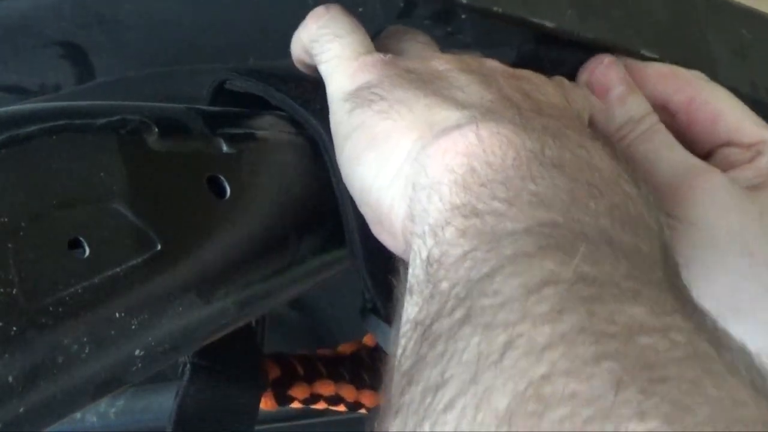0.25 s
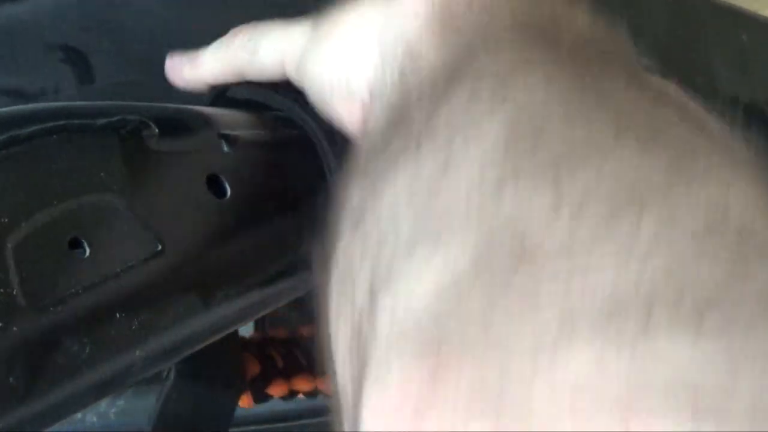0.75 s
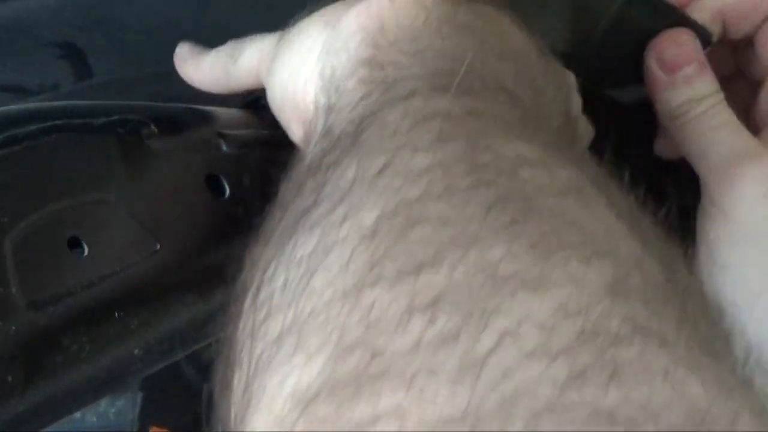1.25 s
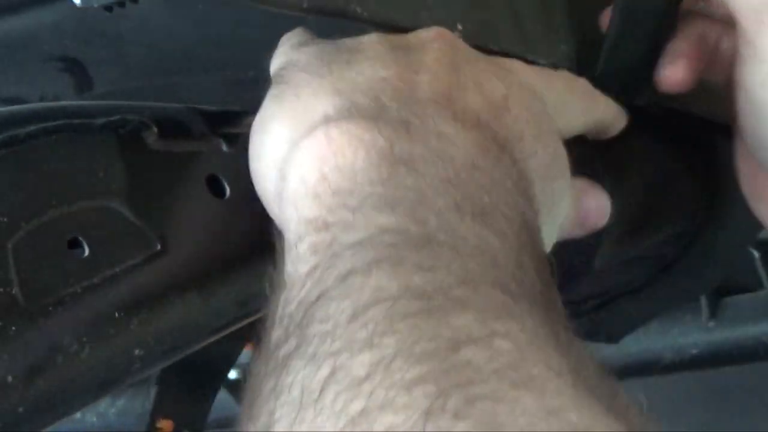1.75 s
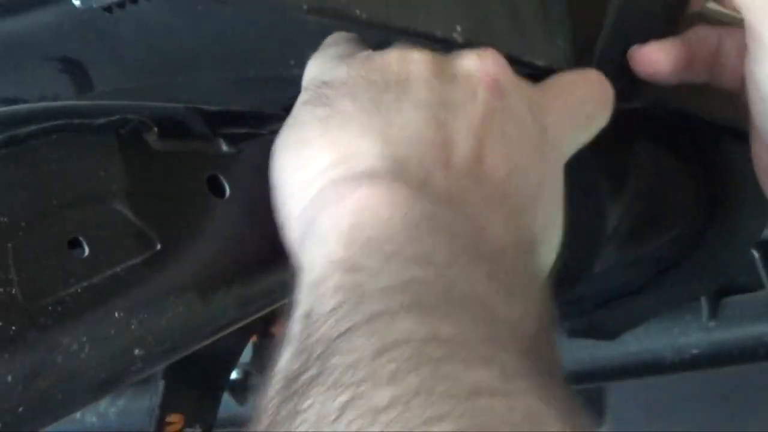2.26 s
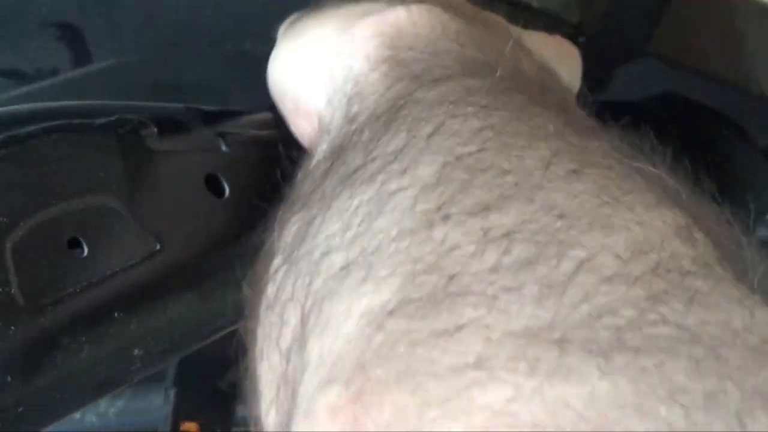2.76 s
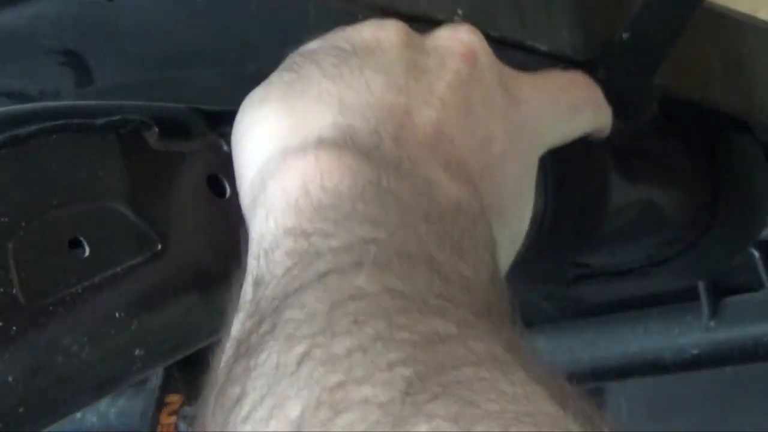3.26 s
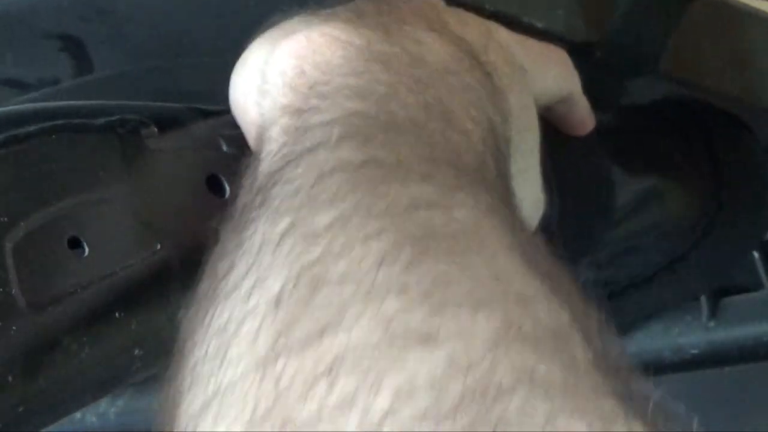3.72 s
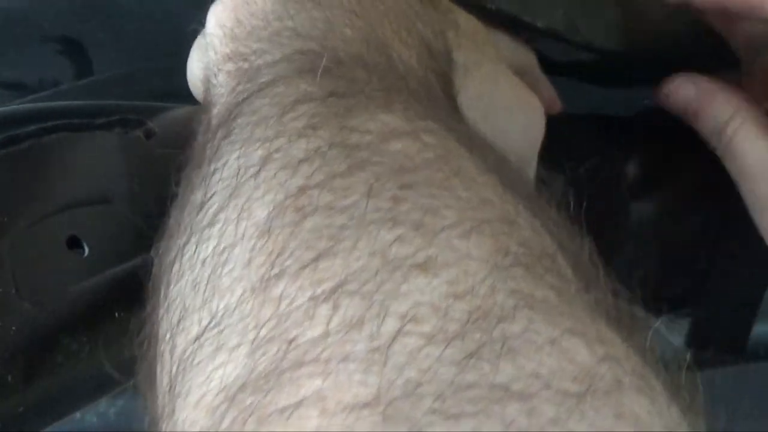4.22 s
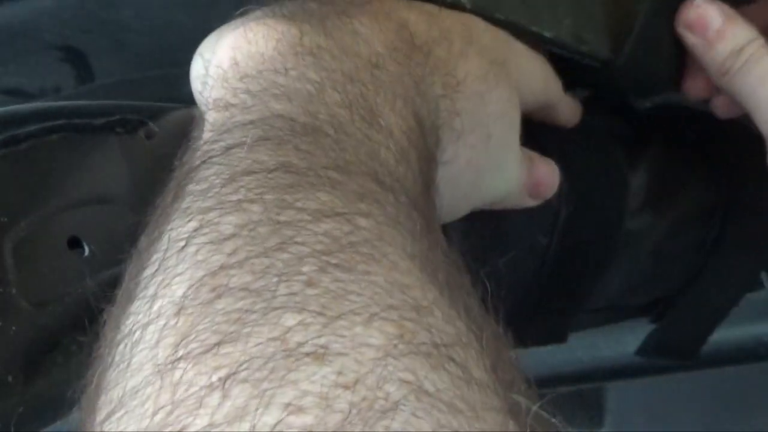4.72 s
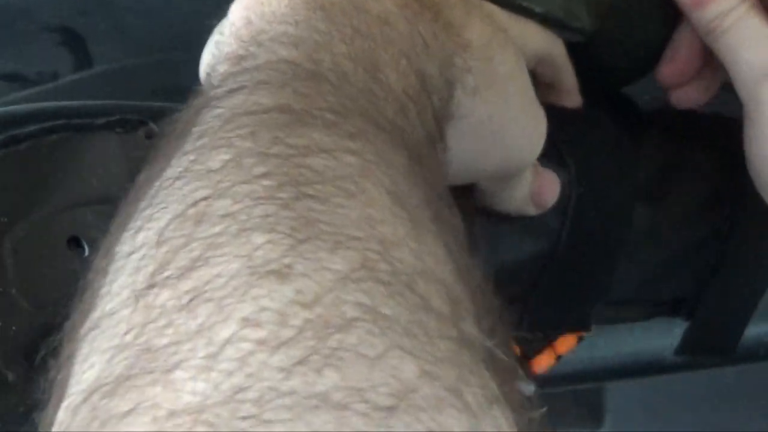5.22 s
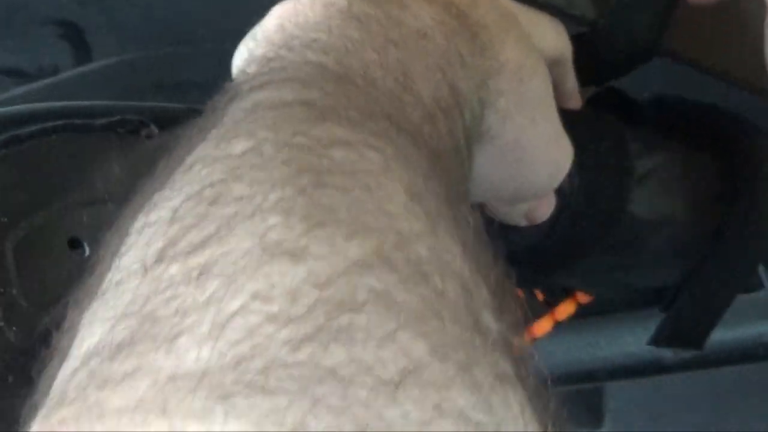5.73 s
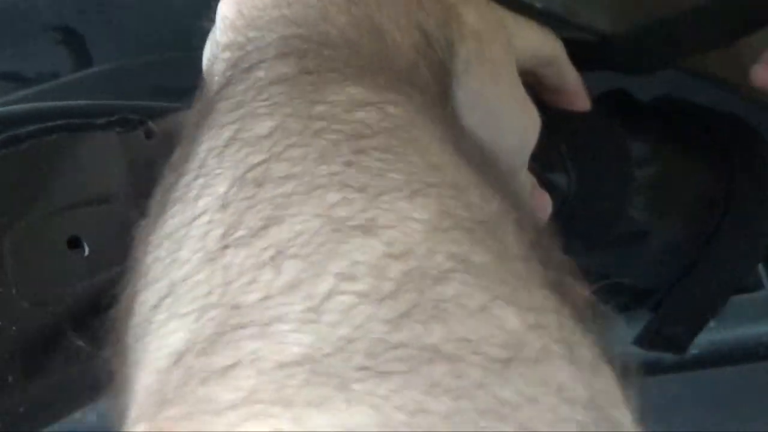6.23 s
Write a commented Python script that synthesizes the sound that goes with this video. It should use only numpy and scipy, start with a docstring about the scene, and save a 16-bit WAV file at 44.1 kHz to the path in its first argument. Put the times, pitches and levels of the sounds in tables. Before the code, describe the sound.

Hook-and-loop straps ripped open and pressed shut in short crackly bursts, with soft fabric rustling and light knocks, close up in a garage.

```python
"""Hook-and-loop straps in a garage

Straps on a fabric bag are ripped open and pressed shut close to a stereo microphone.
Hooks snap free one by one over a dense crackle of small hooks and stiff backing. Hands rustle the
cloth, push the bag and knock the panel under it; a finger squeaks. Behind: air, hiss, deep rumble."""
import sys
import numpy as np
from scipy import signal
from scipy.fft import rfft, irfft, next_fast_len
from scipy.io import wavfile
from scipy.ndimage import uniform_filter1d

SR = 44100
rng = np.random.default_rng(int(sys.argv[2]) if len(sys.argv) > 2 else 0)


def transcribe(u):
    """Save the signal u as a 16-bit wav file named by the first command-line argument.

    u: samples, shape (n,) or (channels, n), limited to [-1, 1]; the rate is SR.
    q: integer samples, one column per channel.
    """
    v = np.clip(np.atleast_2d(u).T, -1, 1)
    q = np.round(v * 32767).astype(np.int16)
    wavfile.write(sys.argv[1], SR, q)


N = 285768

# still air and microphone hiss (frequency [Hz], density [dB])
AIR_SPECTRUM = [(15, -30), (30, -17), (60, -3), (200, 2.5), (400, 4.5), (1000, 4.5), (2000, 0.5),
                (8000, -8.5), (13000, -11), (14500, -42)]
# deep rumble (time [s], level [dB])
RUMBLE_LEVELS = [(0.0, -73), (0.11, -72.5), (0.65, -90), (0.96, -61.5), (1.17, -83), (1.26, -65),
                 (1.53, -84), (1.7, -60), (2.02, -83), (2.98, -70), (3.32, -80), (3.93, -72), (4.42, -85.5),
                 (5.68, -79), (5.72, -73), (6.48, -60)]
# deep rumble (frequency [Hz], density [dB])
RUMBLE_SPECTRUM = [(15, -25), (30, -3), (50, -5.5), (100, 3.5), (140, -2), (250, -53)]
# reflections (frequency [Hz], T60 [s], level [dB], side over mid [ratio])
GARAGE_BANDS = [(151, 0.88, -5.5, 0.023), (400, 0.76, -9.5, 0.16), (885, 0.49, -5, 0.34),
                (3000, 0.32, -9, 0.52), (6150, 0.37, -9.5, 0.58), (10900, 0.076, -5, 0.2)]
# finger on the panel (time [s], slip rate [Hz], level [dB])
SQUEAK_PATH = [(3.86, 500, -60), (3.87, 650, -47), (3.876, 1040, -44), (3.889, 1075, -39), (3.9, 1040, -53),
               (3.99, 1040, -66)]
# panel modes (frequency [Hz], gain [dB], T60 [s])
PANEL_MODES = [(178.8, -7.5, 0.28), (252, -6, 0.22), (347, -7, 0.16), (555, -7, 0.052), (700, -2.5, 0.076),
               (825, -6, 0.099), (1138, 5.5, 0.035), (2150, 9, .006)]
# knocks on the panel (time [s], strength [dB], pitch favoured by the spot [Hz])
PANEL_KNOCKS = [(0.049, -52.5, 200), (0.806, -44, 265), (.86, -41.5, 197), (1.241, -42, 200),
                (1.525, -33.5, 1130), (1.605, -35.5, 350), (1.637, -44, 186), (2.738, -44.5, 313),
                (3.0945, -33, 2000), (3.101, -37.5, 630), (3.826, -40, 255), (3.884, -41, 250),
                (5.64, -39, 368), (6.075, -44, 332), (6.125, -42, 163), (6.236, -45, 400),
                (6.362, -34.5, 330), (6.376, -40.5, 180)]
# pushed bag (frequency [Hz], density [dB])
BAG_SPECTRUM = [(15, -52), (40, -13), (80, -15), (170, 2.5), (260, 2.5), (350, 5), (600, 2), (1200, -14)]
# ongoing cloth rustle, rising and falling (time [s], crackle [dB], bag [dB])
RUSTLE_LEVELS = [(0, -87, -72), (.3, -67.5, -78), (.5, -67, -69.5), (.68, -73, -89), (1.1, -78, -68),
                 (1.9, -75, -79), (2.2, -69.5, -70), (3.0, -57.5, -55.5), (3.25, -62, -89),
                 (3.43, -60.5, -62), (3.65, -67.5, -68), (3.98, -62, -106), (4.18, -73.5, -67),
                 (4.45, -65, -66), (4.66, -71, -88.5), (4.92, -59.5, -65), (5.5, -61.5, -71),
                 (6.1, -67, -61), (6.22, -65.5, -75.5), (6.48, -102, -74)]
# hand moves (full strength at [s], swell [s], hold [s], crackle [dB], backing [dB], bag [dB])
HAND_TUGS = [(0.042, 0.061, 0.039, -55, -63.5, -66.5), (0.152, 0.016, 0.012, -60, -80, -67),
             (0.813, 0.1, 0.051, -50, -49.5, -56.5), (0.931, 0.027, 0.027, -58.5, -63, -59),
             (1.231, 0.003, 0.036, -34, -49, -49), (1.29, .03, 0.11, -53.5, -70, -77),
             (1.441, 0.0062, 0.013, -53, -54, -62), (1.49, 0.0053, 0.0079, -53, -42, -55),
             (1.527, 0.0077, 0.043, -41.5, -43, -56.5), (1.594, 0.004, 0.024, -35, -43, -44.5),
             (1.686, 0.045, .12, -57.5, -57.5, -63), (2.021, 0.13, 0.088, -59.5, -72, -70),
             (2.281, 0.067, 0.012, -49, -53, -60), (2.306, 0.0028, 0.0076, -40, -41.5, -63),
             (2.337, 0.0054, 0.0043, -44, -51, -62), (2.358, 0.0044, 0.0037, -37.5, -56, -68),
             (2.399, 0.002, 0.012, -42, -47, -66), (2.46, 0.0058, 0.032, -42, -41, -59),
             (2.558, 0.0049, 0.0054, -34, -42, -77), (2.593, 0.0053, 0.0082, -44, -40.5, -75),
             (2.627, 0.003, 0.025, -40, -46, -64), (2.666, 0.041, 0.027, -31, -68, -81),
             (2.729, 0.073, 0.072, -29.5, -63, -51.5), (2.872, 0.091, 0.038, -29, -42, -47),
             (3.095, 0.0076, 0.021, -81, -54, -48.5), (3.787, 0.13, 0.048, -53.5, -76, -55),
             (3.86, 0.017, 0.024, -49, -46.5, -48), (4.077, 0.017, 0.027, -61.5, -59.5, -65),
             (4.258, 0.0089, 0.0049, -48, -60, -61), (4.584, 0.015, 0.01, -57.5, -91, -72),
             (4.789, 0.31, 0.026, -53.5, -57.5, -65.5), (5.019, 0.0061, 0.022, -47.5, -54.5, -62),
             (5.266, 0.13, 0.12, -42.5, -72, -55.5), (5.591, 0.0029, 0.0059, -39.5, -71, -56.5),
             (5.64, 0.045, 0.06, -35, -71, -51), (5.715, 0.085, 0.049, -31, -70, -49.5),
             (5.85, 0.077, 0.04, -28.5, -42, -47), (5.972, 0.018, 0.011, -30.5, -50, -50.5),
             (6.067, .01, 0.081, -56.5, -72, -63), (6.23, .01, 0.078, -84, -61.5, -59),
             (6.351, 0.024, 0.016, -68, -55, -51)]
# stiff backing (frequency [Hz], gain [dB])
BACKING_SPECTRUM = [(600, 3.5), (900, 0), (1300, 6.5), (1900, 6), (2600, 11)]
# base colour of all hooks (frequency [Hz], gain [dB])
HOOK_SPECTRUM = [(700, 20), (2000, 6), (3000, 6.5), (4500, 4.5), (6500, 6), (9000, 7.5), (11500, 7),
                 (14000, 5.5)]
# how the strap is held (time [s], low cut [Hz], gain of the fold's hollow [dB])
STRAP_GRIP = [(0.0, 2600, -6), (1.2, 4300, 12.5), (1.3, 4300, -10), (1.45, 2950, 2), (2.2, 2350, -1),
              (2.3, 1190, 2.5), (2.72, 1300, -0.5), (2.85, 1950, -3.5), (4.9, 2800, 1.5), (5.15, 3000, 3.5),
              (5.4, 3000, 7), (5.6, 3420, 12), (5.76, 3430, 7.5), (5.82, 2280, -2), (5.96, 2800, 1.5)]
# loudest hooks (time [s], peak [dB], ring [Hz])
HOOK_SNAPS = [(.0502, -37, 3400), (.3769, -40, 9700), (.4618, -42, 10000), (.8134, -26, 5900),
              (.8264, -26, 6500), (.8446, -21, 5800), (.869, -15, 5100), (.8779, -24, 5300),
              (.9563, -36, 10900), (1.2005, -39, 5600), (1.2315, -19, 7500), (1.2354, -13, 6700),
              (1.239, -17, 5900), (1.2451, -17, 6900), (1.2493, -14, 5900), (1.2541, -10, 6100),
              (1.2579, -10, 8600), (1.263, -9, 6100), (1.4705, -26, 6100), (1.485, -18, 7200),
              (1.4928, -14, 5600), (1.5192, -12, 5700), (1.532, -18, 5000), (1.5472, -21, 5300),
              (1.5592, -21, 6000), (1.5749, -23, 8000), (1.5922, -18, 5700), (1.6841, -26, 8300),
              (1.711, -28, 9400), (1.7314, -29, 8000), (1.7573, -24, 6400), (1.7991, -25, 8100),
              (2.0949, -34, 9500), (2.271, -28, 5700), (2.2763, -20, 7500), (2.2842, -21, 7800),
              (2.3092, -13, 8200), (2.3155, -18, 6500), (2.3373, -14, 5000), (2.3429, -20, 8000),
              (2.3611, -17, 5600), (2.3987, -14, 5200), (2.4267, -19, 5400), (2.4357, -23, 4300),
              (2.455, -20, 5600), (2.4624, -19, 5600), (2.4693, -15, 6500), (2.4808, -18, 4400),
              (2.4855, -17, 4100), (2.5098, -22, 6200), (2.5255, -18, 4100), (2.5588, -17, 5900),
              (2.5874, -23, 4100), (2.6165, -27, 5500), (2.6285, -18, 5400), (2.6335, -19, 6000),
              (2.6405, -19, 6000), (2.6628, -16, 5000), (2.6692, -16, 3400), (2.6833, -15, 4800),
              (2.6971, -18, 4800), (2.76, -15, 7500), (2.8372, -19, 6400), (2.8761, -13, 6900),
              (2.8929, -12, 7700), (2.9247, -11, 8900), (2.982, -28, 3900), (3.0948, -31, 2600),
              (3.1538, -30, 8300), (3.2666, -25, 10200), (3.7708, -31, 3840), (3.7849, -22, 6000),
              (4.0702, -41, 6700), (4.2575, -28, 6500), (4.3984, -41, 8800), (4.4506, -41, 10900),
              (4.7488, -32, 8600), (4.7818, -20, 7900), (4.7887, -18, 8800), (4.7949, -18, 7800),
              (4.8256, -22, 8400), (5.0183, -11, 6800), (5.0335, -16, 7100), (5.0915, -10, 5800),
              (5.0957, -10, 6700), (5.1724, -17, 5800), (5.1753, -12, 6000), (5.1793, -10, 6000),
              (5.2044, -22, 7000), (5.232, -17, 6200), (5.238, -11, 6600), (5.2461, -20, 5500),
              (5.2599, -14, 6900), (5.2659, -5, 6700), (5.292, -20, 5200), (5.3103, -13, 7200),
              (5.3149, -13, 4900), (5.3227, -12, 6500), (5.3406, -11, 6700), (5.3515, -14, 4300),
              (5.3631, -16, 5800), (5.3756, -19, 4900), (5.3798, -13, 6600), (5.476, -24, 4600),
              (5.481, -23, 5000), (5.5872, -18, 5900), (5.5949, -10, 3900), (5.5993, -17, 4200),
              (5.6112, -17, 4000), (5.6196, -17, 3900), (5.6351, -12, 3900), (5.6408, -11, 4800),
              (5.6468, -7, 4600), (5.6662, -13, 4700), (5.6975, -12, 5800), (5.7138, -15, 4300),
              (5.7264, -9, 4400), (5.7359, -11, 4600), (5.8053, -18, 7900), (5.8108, -16, 5700),
              (5.8322, -16, 8400), (5.8514, -9, 8500), (5.8711, -11, 8900), (5.8854, -12, 5800),
              (5.9168, -19, 6900), (5.9308, -19, 9000), (5.9496, -14, 7300), (5.9715, -16, 7500),
              (5.9857, -13, 6700)]
# microphone balance (frequency [Hz], left over right [dB])
MIC_BALANCE = [(300, -0.6), (1200, 0), (2500, -0.5), (5000, -2.5), (12000, 0)]


def amp(db):
    """dB to gain."""
    return 10 ** (np.asarray(db) / 20)


def unit_rms(x):
    """Scale to rms 1."""
    return x / np.sqrt(np.mean(x ** 2) + 1e-20)


def in_time(rows):
    """Each column after time, interpolated per sample."""
    times_s, *columns = np.transpose(rows)
    return [np.interp(np.arange(N) / SR, times_s, c) for c in columns]


def at_hz(rows, hz, column=1):
    """Interpolate a column over log frequency."""
    table = np.array(rows)
    return np.interp(np.log(np.maximum(hz, 1)), np.log(table[:, 0]), table[:, column])


def colour(x, spectrum):
    """Zero-phase filter from a spectrum table."""
    size = next_fast_len(x.shape[-1])
    gain = amp(at_hz(spectrum, np.fft.rfftfreq(size, 1 / SR)))
    return irfft(rfft(x, size) * gain, size)[..., :x.shape[-1]]


def butter(x, order, hz, kind):
    """Butterworth filter."""
    return signal.sosfilt(signal.butter(order, hz, kind, fs=SR, output="sos"), x)


def minimum_phase(level_db):
    """Causal response of given magnitude, by the folded cepstrum."""
    cepstrum = irfft(np.log(amp(level_db)))
    half = cepstrum.shape[-1] // 2
    fold = np.r_[1, np.full(half - 1, 2), 1, np.zeros(half - 1)]
    return np.exp(rfft(cepstrum * fold))


def drift(corner_hz):
    """Slow noise, rms 1."""
    r = np.exp(-2 * np.pi * corner_hz / SR)
    return unit_rms(signal.lfilter([1], [1, -2 * r, r * r], rng.standard_normal(N + SR))[SR:])


def ring(clicks, hz, t60_s):
    """Resonator: a unit click starts a decaying unit sine."""
    r, w = amp(-60 / (t60_s * SR)), 2 * np.pi * hz / SR
    return signal.lfilter([0, np.sin(w)], [1, -2 * r * np.cos(w), r * r], clicks + 1e-18)


def grains(colour_db, per_s, spread_db, clump_db, band_hz, t60_cycles):
    """Random clicks, uneven and clumped in level, dealt to 16 short resonances; rms 1."""
    sizes = amp(spread_db * np.minimum(rng.exponential(1, N), 4) + clump_db * drift(56.5))
    clicks = sizes * rng.choice([-1, 1], N) * (rng.random(N) < per_s / SR)
    pitches_hz, dealt = np.geomspace(*band_hz, 16), rng.integers(0, 16, N)
    clicks /= np.sqrt(sum(amp(colour_db(hz)) ** 2 / hz for hz in pitches_hz))  # colour leaves power even
    return unit_rms(sum(ring(clicks * (dealt == k) * amp(colour_db(hz)), hz, t60_cycles / hz)
                        for k, hz in enumerate(pitches_hz)))


def air(level_db=-69, width=0.66):
    """Still air and microphone hiss: steady stereo noise."""
    mid, side = colour(rng.standard_normal((2, N)), AIR_SPECTRUM)
    return amp(level_db) * unit_rms(mid + width * side * [[1], [-1]])


def rumble():
    """Deep noise that swells and sinks."""
    return amp(in_time(RUMBLE_LEVELS)[0]) * unit_rms(colour(rng.standard_normal(N), RUMBLE_SPECTRUM))


def garage(x, onset_s=0.00067):
    """Reflections: a noise tail decaying per band, partly unlike left and right."""
    t = np.arange(SR) / SR
    edges_hz, tail = np.geomspace(60, 16000, 13), 0
    for low, high in zip(edges_hz, edges_hz[1:]):
        t60_s, level_db, width = (at_hz(GARAGE_BANDS, np.sqrt(low * high), c) for c in (1, 2, 3))
        mid, side = butter(rng.standard_normal((2, SR)), 2, [low, high], "band")
        fade = amp(level_db - 60 * t / t60_s) / np.sqrt(t60_s * SR / np.log(1e6))
        tail = tail + fade * (mid + width * side * [[1], [-1]])
    return signal.fftconvolve(x[None], tail * (1 - np.exp(-t / onset_s)), axes=1)[:, :N]


def finger_squeak(rough_db=2.5, wobble=0.015):
    """Stick-slip on the panel: a tone and its octave, unsteady in level and pitch."""
    hz, level_db = in_time(SQUEAK_PATH)
    t = np.arange(N) / SR
    phase = 2 * np.pi * np.cumsum(hz * (1 + wobble * drift(65))) / SR
    sliding = (t > SQUEAK_PATH[0][0]) & (t < SQUEAK_PATH[-1][0])
    return sliding * amp(level_db + rough_db * drift(60)) * (np.sin(phase) + 0.1 * np.sin(2 * phase))


def panel_knocks(focus_db_per_oct2=18, spread_db=1.5, low_cut_hz=140):
    """Each knock rings the panel modes, most those near the pitch of its spot."""
    out = np.zeros(N)
    scatter_db = spread_db * rng.standard_normal((len(PANEL_KNOCKS), len(PANEL_MODES)))
    times_s, strength_db, spot_hz = np.transpose(PANEL_KNOCKS)
    for k, (hz, mode_db, t60_s) in enumerate(PANEL_MODES):
        spot_db = -focus_db_per_oct2 * np.log2(hz / spot_hz) ** 2
        clicks = np.zeros(N)
        clicks[(times_s * SR).astype(int)] = amp(strength_db + mode_db + scatter_db[:, k] + spot_db)
        out += ring(clicks, hz, t60_s)
    return butter(out, 3, low_cut_hz, "high")


def bag_push(flutter_db=2.6):
    """Pushed fabric: dull noise of unsteady level."""
    return amp(flutter_db * drift(12.5)) * unit_rms(colour(rng.standard_normal(N), BAG_SPECTRUM))


def hand_effort(swell_db=31, fade_db_per_s=(414, 242, 153), backing_rustle_db=-8.5):
    """Gains of crackle, backing and bag: each tug swells, holds and fades over the rustle."""
    t = np.arange(N) / SR
    crackle_db, bag_db = in_time(RUSTLE_LEVELS)
    power = amp([crackle_db, crackle_db + backing_rustle_db, bag_db]) ** 2
    for full_s, swell_s, hold_s, *levels_db in HAND_TUGS:
        before_db = swell_db * np.maximum(full_s - t, 0) / swell_s
        after_db = np.c_[list(fade_db_per_s)] * np.maximum(t - full_s - hold_s, 0)
        power += amp(np.c_[levels_db] - before_db - after_db) ** 2
    return np.sqrt(power)


def backing_flex():
    """The stiff backing crackles in the midrange as it bends."""
    return grains(lambda hz: at_hz(BACKING_SPECTRUM, hz), per_s=2500, spread_db=3, clump_db=2.5,
                  band_hz=(600, 2600), t60_cycles=8)


def hook_colour_db(hz, hook_hz, low_cut_hz, fold_db, focus_db_per_oct2, fold_hz=3900, fold_oct=0.28):
    """A hook favours its own pitch; the grip thins the bass, the fold's hollow adds a peak or dip."""
    pitch_db = -focus_db_per_oct2 * np.log2(hz / hook_hz) ** 2
    thin_db = -10 * np.log10(1 + (low_cut_hz / hz) ** 6)
    hollow_db = fold_db * np.exp(-(np.log2(hz / fold_hz) / fold_oct) ** 2)
    return at_hz(HOOK_SPECTRUM, hz) + pitch_db + thin_db + hollow_db


def snap_trails(re_peak_db=-27.5, t60_s=0.039):
    """Gain of the small hooks that tear on after each big snap."""
    times_s, peak_db, _ = np.transpose(HOOK_SNAPS)
    starts = np.zeros(N)
    starts[(times_s * SR).astype(int)] = amp(peak_db + re_peak_db)
    return signal.lfilter([1], [1, -amp(-60 / (t60_s * SR))], starts + 1e-18)


def hook_crackle(tearing, medium_db=-15):
    """Many small and fewer medium hooks let go at random, pitched like the big snaps near in time."""
    hook_hz = uniform_filter1d(in_time(HOOK_SNAPS)[1], size=2000)
    grip = in_time(STRAP_GRIP)
    small = grains(lambda hz: hook_colour_db(hz, hook_hz, *grip, focus_db_per_oct2=4.55),
                   per_s=3000, spread_db=0.6, clump_db=2.1, band_hz=(800, 12750), t60_cycles=9.5)
    medium = grains(lambda hz: hook_colour_db(hz, hook_hz, *grip, focus_db_per_oct2=1),
                    per_s=180, spread_db=4, clump_db=5, band_hz=(3000, 9500), t60_cycles=6)
    return (tearing + snap_trails()) * small + tearing * amp(medium_db) * medium


def hook_snaps(rise_s=0.00008, release_s=0.0006, slip_s=0.002, slip_db=-24):
    """A big hook lets go with a jolt, fibres slip on, the strap rings in that hook's colour."""
    times_s, peak_db, hook_hz = np.transpose(HOOK_SNAPS)
    starts, t = (times_s * SR).astype(int), np.arange(1024) / SR
    envelope = (1 - np.exp(-t / rise_s)) * (np.exp(-t / release_s) + amp(slip_db) * np.exp(-t / slip_s))
    jolts = rng.standard_normal((len(starts), len(t))) * envelope
    grip = [column[starts, None] for column in in_time(STRAP_GRIP)]
    hz = np.fft.rfftfreq(len(t), 1 / SR) + 50  # offset avoids log(0)
    colour_db = hook_colour_db(hz, hook_hz[:, None], *grip, focus_db_per_oct2=5)
    snaps = irfft(rfft(jolts) * minimum_phase(colour_db))
    snaps *= (amp(peak_db) / np.abs(signal.hilbert(snaps)).max(axis=1))[:, None]
    out = np.zeros(N + len(t))
    np.add.at(out, starts[:, None] + np.arange(len(t)), snaps)
    return out[:N]


def scene(strap_low_cut_hz=780):
    """Strap, bag and panel at the microphone, the garage around them."""
    tearing, flexing, pushing = hand_effort()
    strap = hook_crackle(tearing) + flexing * backing_flex() + hook_snaps()
    strap = butter(strap, 3, strap_low_cut_hz, "high")  # the strap stays out of the bass
    near = strap + panel_knocks() + pushing * bag_push() + finger_squeak()
    return air() + rumble() + garage(near) + near


def record(dry, rolloff_hz=13300, stop_hz=16400):
    """Stereo microphone: right slightly louder; the top rolls off, then is cut."""
    left = colour(dry[0], [(hz, db / 2) for hz, db in MIC_BALANCE])
    right = colour(dry[1], [(hz, -db / 2) for hz, db in MIC_BALANCE])
    soft = butter([left, right], 8, rolloff_hz, "low")
    return signal.sosfilt(signal.cheby2(12, 70, stop_hz, fs=SR, output="sos"), soft)


dry = scene()
out = record(dry)
transcribe(out)
```